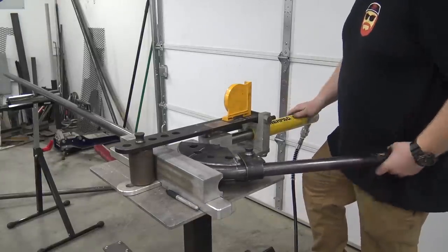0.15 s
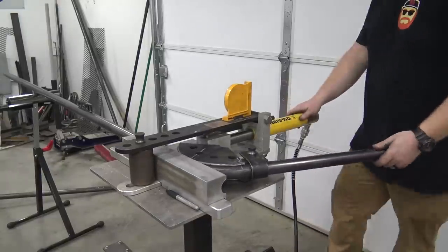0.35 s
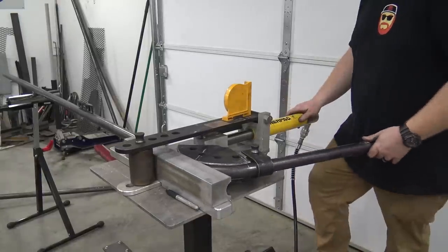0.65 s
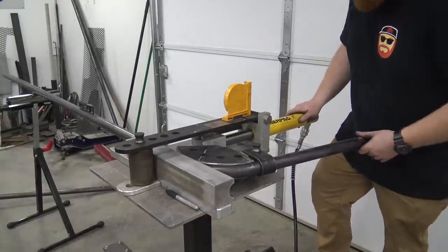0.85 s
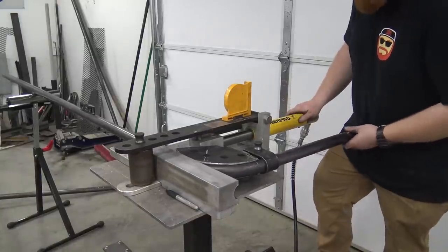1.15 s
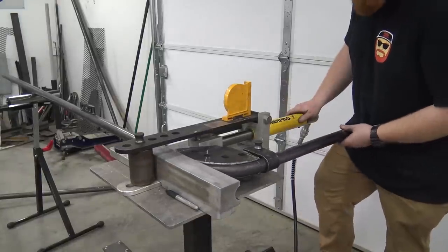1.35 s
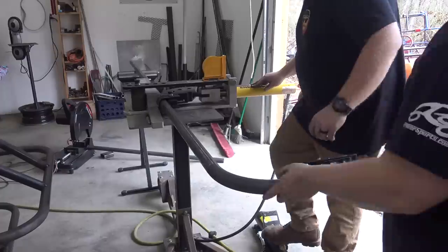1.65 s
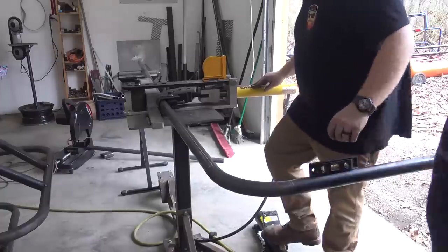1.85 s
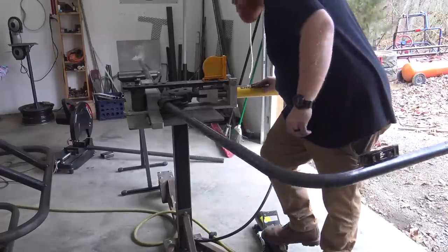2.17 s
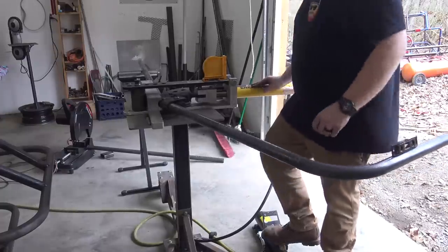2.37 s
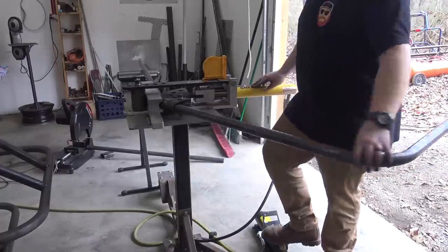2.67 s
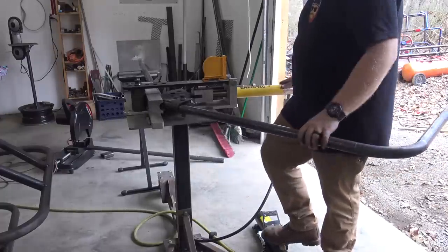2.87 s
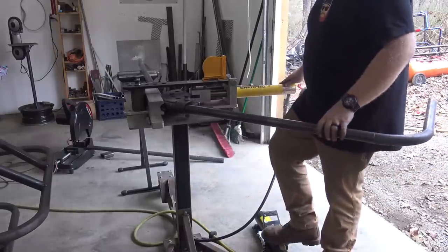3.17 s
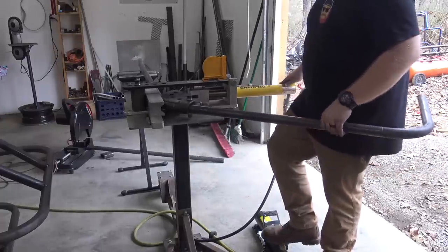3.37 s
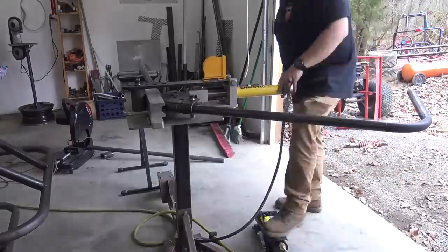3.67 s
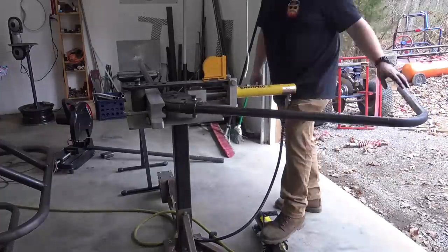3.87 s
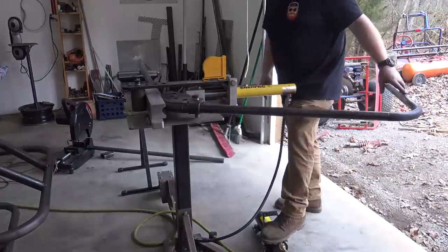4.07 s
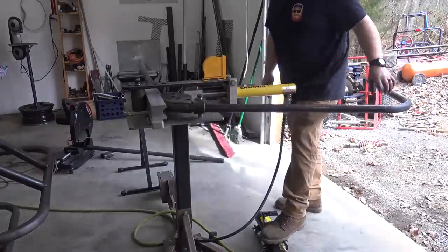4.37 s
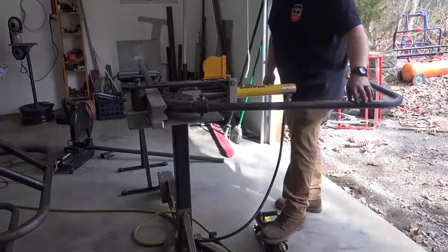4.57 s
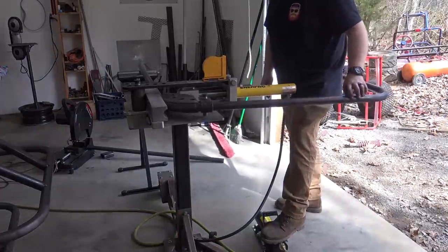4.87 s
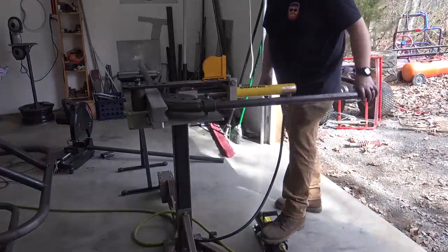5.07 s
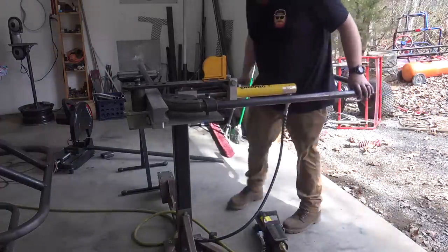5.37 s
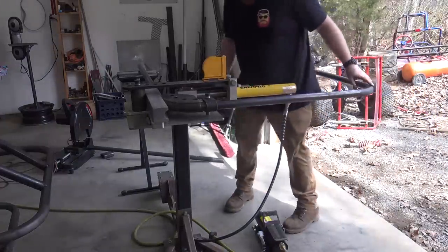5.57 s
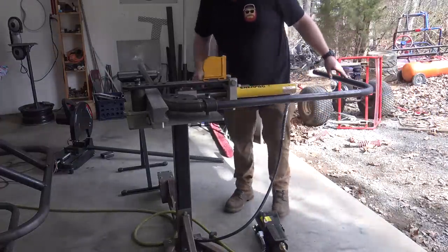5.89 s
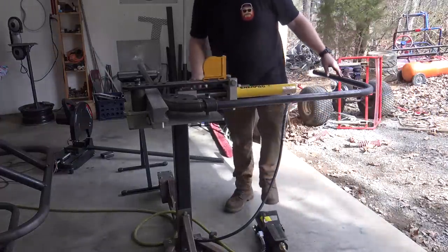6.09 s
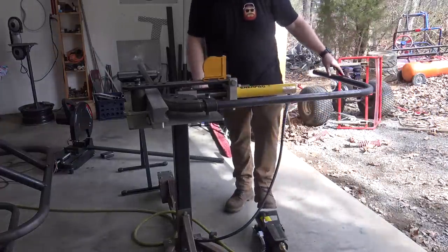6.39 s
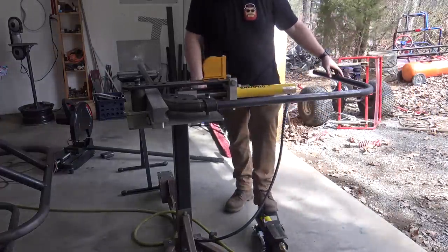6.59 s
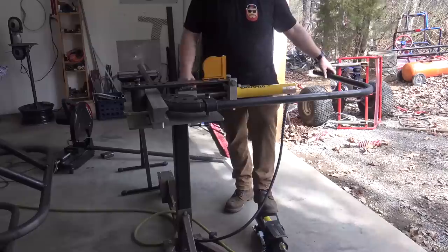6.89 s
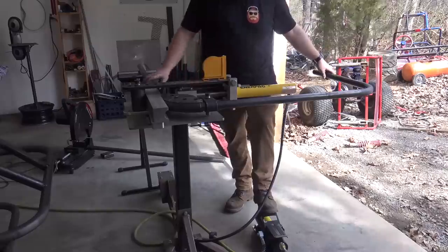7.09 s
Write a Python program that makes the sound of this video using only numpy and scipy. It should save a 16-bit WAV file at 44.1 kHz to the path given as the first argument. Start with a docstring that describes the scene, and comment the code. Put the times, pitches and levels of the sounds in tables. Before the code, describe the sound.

An air-driven foot pump chatters with rapid thumps and hissing spits in a garage, then cuts off, leaving a low machine hum.

```python
"""Foot pump in a garage

One microphone, near an air-driven hydraulic foot pump that works a tube bender. Each piston
stroke lets out a pressure pulse and a sharp spit of exhaust air, eight or nine a second, and
the walls answer. At an abrupt cut the pump's sound ends and the low hum of a motor and
compressor further off is left."""
import sys
import numpy as np
from scipy import signal
from scipy.fft import rfft, irfft, next_fast_len
from scipy.io import wavfile

SR = 44100
rng = np.random.default_rng(int(sys.argv[2]) if len(sys.argv) > 2 else 0)


def int16_out(signal):
    """Quantize to a 16-bit WAV file."""
    q = np.round(np.clip(np.atleast_2d(signal).T, -1, 1) * 32767)
    wavfile.write(sys.argv[1], SR, q.astype(np.int16))


N = 319284
TIME = np.arange(N) / SR
CUT_S = 5.412
SINCE_CUT_S = np.maximum(TIME - CUT_S, 0)
MOTOR_HZ, COMPRESSOR_HZ = 59.2, 26.25


def from_db(db):
    """Decibels to gain."""
    return 10 ** (np.asarray(db) / 20)


def at_hz(table, hz):
    """Each column of a spectrum table at the given frequencies."""
    known_hz, *columns = np.transpose(table)
    return [np.interp(np.log(hz + 1), np.log(known_hz), column) for column in columns]


def noise(spectrum):
    """Steady noise of a given colour, rms 1."""
    size = next_fast_len(N)
    level_db, = at_hz(spectrum, np.arange(size // 2 + 1) * SR / size)
    coloured = irfft(rfft(rng.standard_normal(size)) * from_db(level_db), size)[:N]
    return coloured / np.sqrt(np.mean(coloured ** 2) + 1e-20)


def drift(rate_hz):
    """A slow random wander, of the order of 1."""
    knots = rng.standard_normal(400)
    return np.interp(TIME * rate_hz, np.arange(len(knots)), knots)


def tone(turns, multiple, waver_db):
    """One partial of a rotating machine, its level wavering about rms 1."""
    phase = 2 * np.pi * (multiple * turns + rng.random())
    return np.sqrt(2) * np.sin(phase) * from_db(waver_db * drift(5))


def ring(clicks, hz, t60):
    """Each click sets a decaying sine ringing."""
    decay, angle = from_db(-60 / (t60 * SR)), 2 * np.pi * hz / SR
    return signal.lfilter([0, np.sin(angle)], [1, -2 * decay * np.cos(angle), decay ** 2], clicks + 1e-18)


def click_train(times, level_db):
    """One click at each time."""
    clicks = np.zeros(N)
    clicks[np.clip(np.round(times * SR).astype(int), 0, N - 1)] = from_db(level_db)
    return clicks


# The background rush, body and hiss. Each row: frequency in Hz, relative density in dB.
RUSH_BODY = [(12, -9), (22, 7), (40, -15), (85, -8), (170, -7.5), (400, -4.5), (650, -8), (1150, -6.5),
             (1700, -14), (3000, -19), (6000, -43)]
RUSH_HISS = [(800, -25), (2000, -15), (2900, -9), (3600, 2), (4300, -2.5), (5250, 0.5), (6800, -9),
             (10000, -13), (13000, -19), (16000, -31)]

def rush(pumping, pumping_db, throb):
    body = from_db(-37.5 + 2 * SINCE_CUT_S) * noise(RUSH_BODY)
    hiss = from_db(-47 + 1.2 * SINCE_CUT_S) * noise(RUSH_HISS)
    beat = 1 + throb * np.sin(2 * np.pi * COMPRESSOR_HZ * TIME)
    return (body + hiss) * beat * from_db(pumping_db * pumping)


# Swells of a background drone. Each row: start in seconds, length in seconds, harmonic, level in dB.
DRONE_SWELLS = [(5.36, 0.64, 2, -38), (5.75, 1.5, 1, -40.5), (6.3, 0.7, 2, -39)]

def drone(hz, sharp_hz, settle_s):
    """A low tone and its octave swell and fade, starting a little sharp and then settling."""
    turns = np.cumsum(hz + sharp_hz * np.exp(-SINCE_CUT_S / settle_s)) / SR
    swells = np.zeros(N)
    for start, length, multiple, db in DRONE_SWELLS:
        inside_s = np.minimum(TIME - start, start + length - TIME)
        fade = np.clip(inside_s / (0.18 * length), 0, 1)
        swells += from_db(db) * fade * tone(turns, round(multiple), waver_db=0.5)
    return swells


# The motor's hum. Each row: multiple of shaft speed, level in dB before the cut, level in dB after it.
MOTOR_PARTIALS = [(1, -36, -42.5), (2, -41, -44.5), (4, -46.5, -54), (5, -51.5, -46)]

def motor(pumping, run_s):
    """A motor hums further off, at multiples of its shaft speed."""
    return sum(from_db(after + pumping * (during - after)) * tone(MOTOR_HZ * run_s, multiple, waver_db=0)
               for multiple, during, after in MOTOR_PARTIALS)


# The compressor's hum. Each row: multiple of its beat, relative level in dB.
COMPRESSOR_PARTIALS = [(2, -45), (3, -54), (5, -55), (6, -50.5), (7, -57), (8, -47.5), (10, -63),
                       (13, -46.5), (16, -48.5), (19, -53.5), (20, -49.5), (22, -55), (23, -49.5),
                       (27, -52.5), (32, -51)]

def compressor(pumping, run_s, level_db, pumping_db):
    """The distant compressor hums in harmonics of its beat, fainter before the cut."""
    hum = sum(from_db(db) * tone(COMPRESSOR_HZ * run_s, multiple, waver_db=1.5)
              for multiple, db in COMPRESSOR_PARTIALS)
    return from_db(level_db + pumping_db * pumping) * hum


# Stirred air around the microphone. Each row: frequency in Hz, relative density in dB.
RUMBLE_SPECTRUM = [(5, -22), (12, 4), (18, -4), (25, -14), (42, -8), (65, -23), (250, -48), (2000, -80)]

def rumble(pumping, level_db):
    """Spent air stirs the room very slowly while the pump runs."""
    return pumping * from_db(level_db) * noise(RUMBLE_SPECTRUM)


# The garage's diffuse sound. Each row: frequency in Hz, relative level in dB, t60 in seconds.
GARAGE_BANDS = [(25, 9, .45), (80, 1.5, 0.44), (170, -2.5, 0.27), (262, -5, 0.13), (390, -6.5, 0.11),
                (533, -3, 0.26), (663, 6.5, 0.22), (844, -2, 0.17), (1290, 4.5, 0.19), (2100, 6, 0.21),
                (3950, 5.5, 0.17), (5020, -1.5, 0.1), (7000, -1, 0.19), (10500, -7, 0.18),
                (15500, -9.5, 0.08)]

def garage(sound, build_s, late_db, late_t60, wet_db):
    """Sound scattered round the garage builds up, then dies band by band over a faint late tail."""
    size = SR // 2
    age, hz = np.arange(size) / SR, np.arange(size // 2 + 1) * SR / size
    white, response = rfft(rng.standard_normal(size)), np.zeros(size)
    build, fading_s = np.minimum(age / build_s, 1), np.maximum(age - build_s, 0)
    edges_hz = np.geomspace(50, 17000, 32)
    for low, high in zip(edges_hz, edges_hz[1:]):
        level_db, t60 = at_hz(GARAGE_BANDS, np.sqrt(low * high))
        fade = from_db(-60 * fading_s / t60) + from_db(late_db - 60 * fading_s / late_t60)
        band = irfft(white * ((hz >= low) & (hz < high)), size) * build * fade
        unity_gain = np.sqrt(2 * (high - low) / SR / np.sum(band ** 2))
        response += from_db(level_db + wet_db) * unity_gain * band
    return signal.fftconvolve(sound, response)[:N]


# First echoes from floor, door and walls. Each row: delay in seconds, signed relative gain.
FIRST_ECHOES = [(.0132, 0.046), (.0217, -0.0022), (0.025, -0.058), (.0300, 0.042), (0.04, 0.18),
                (0.041, -0.2), (.0440, 0.12), (0.0469, -0.07), (.0490, 0.1)]

def echoes(sound, cut_hz, level_db):
    """The large surfaces send distinct, dulled returns to the microphone."""
    dull = from_db(level_db) * signal.sosfilt(signal.butter(2, cut_hz, fs=SR, output="sos"), sound)
    return sum(gain * np.interp(TIME - delay, TIME, dull, left=0) for delay, gain in FIRST_ECHOES)


# The jet through the muffler, close by. Each row: frequency in Hz, relative density in dB.
JET_SPECTRUM = [(500, -15.5), (1200, -8.5), (1900, -14.5), (3000, -9.5), (3650, -6), (4300, -8.5),
                (5050, 1.5), (5650, -0.5), (6300, -6.5), (7400, -9.5), (9000, -5), (11500, -1),
                (15500, -3.5)]

def exhaust(times, levels_db, open_s, empty_s, bleed_s, bleed_db, jet_db):
    """The port opens, the cylinder empties in a few milliseconds and the last air bleeds out."""
    age = np.arange(SR // 10) / SR
    opening = 1 - np.exp(-(age / open_s) ** 2)
    pressure = np.exp(-age / empty_s) + from_db(bleed_db) * np.exp(-age / bleed_s)
    puffs = signal.fftconvolve(click_train(times, levels_db), opening * pressure)[:N]
    return from_db(jet_db) * puffs * noise(JET_SPECTRUM)


def leak(level_db, trace_db, trace_t60):
    """Air seeps past the valve while the pedal is down; a faint trace of hiss fades after the cut."""
    fade_db = trace_db * (SINCE_CUT_S > 0) - 60 * SINCE_CUT_S / trace_t60
    return from_db(level_db + fade_db) * noise(JET_SPECTRUM)


# The pump housing's modes. Each row: frequency in Hz, relative level in dB, t60 in seconds.
HOUSING_MODES = [(159, -23, 0.023), (235, -29, 0.0071), (1190, -41, .008), (5150, -16, 0.0087)]

def valve(times, levels_db, width_s, bounce_s, bounce_db, pulse_db, knock_db, refill_hz):
    """The valve flips: one smooth pressure pulse, a slow rebound and a knock of the housing."""
    clicks = click_train(times, levels_db)
    # The pump stands on concrete: a copy reaches the microphone just behind and hollows the thump.
    bounce = click_train(times + bounce_s, levels_db + bounce_db)
    age = np.arange(-200, 201) / SR
    pulse = -signal.fftconvolve(clicks + bounce, np.exp(-0.5 * (age / width_s) ** 2), "same")
    rebounding = signal.sosfilt(signal.butter(1, refill_hz, "high", fs=SR, output="sos"), pulse)
    knock = sum(from_db(db) * ring(clicks, hz, t60) for hz, db, t60 in HOUSING_MODES)
    return from_db(pulse_db) * rebounding + from_db(knock_db) * knock


# The piston's quickening pace. Each row: time in seconds, strokes per second.
STROKE_RATE = [(0, 7.9445), (0.7, 8.0629), (1.35, 8.256), (2, 8.3907), (2.5, 8.479), (3, 8.7173),
               (3.8, 8.8335), (4.5, 8.8436), (5.3, 8.9204)]

def strokes(first_s, scatter_db):
    """Time, pulse dB and puff dB of each stroke; quicker ones have less time to fill and are weaker."""
    known_s, rates_hz = np.transpose(STROKE_RATE)
    times = [first_s]
    while times[-1] < CUT_S:
        times.append(times[-1] + 1 / np.interp(times[-1], known_s, rates_hz))
    times = np.array(times[:-1])
    quicker_hz = np.interp(times, known_s, rates_hz) - rates_hz[0]
    uneven_db = scatter_db * rng.standard_normal((len(times), 2))
    pulses_db = -6 - 1.63 * quicker_hz + uneven_db[:, 0]
    puffs_db = -9 - 1.0 * quicker_hz + uneven_db[:, 1]
    return times, pulses_db, puffs_db


def foot_pump(directions):
    """The nearby pump thumps and spits; its jet sends unrelated noise each way round the room."""
    times, pulses_db, puffs_db = strokes(first_s=0.0221, scatter_db=0.4)
    thump = valve(times, pulses_db, width_s=0.0002, bounce_s=0.00088, bounce_db=-5,
                  pulse_db=3.5, knock_db=2, refill_hz=115)
    jets = [exhaust(times + 0.00005, puffs_db, open_s=0.00094, empty_s=0.0029,
                    bleed_s=0.022, bleed_db=-15.5, jet_db=10) for _ in range(directions)]
    direct = thump + jets[0]  # only one direction points at the microphone
    jet_room = sum(garage(jet, build_s=0.02, late_db=-21, late_t60=0.86, wet_db=-1) for jet in jets)
    thump_room = garage(thump, build_s=0.032, late_db=-31, late_t60=0.46, wet_db=-5)
    thump_echoes = echoes(thump, cut_hz=1350, level_db=1.5)
    return direct + jet_room / np.sqrt(directions) + thump_room + thump_echoes


def scene():
    """The pump in front, the machines behind; the chatter and its room sound end at the cut."""
    pumping = np.clip((CUT_S - TIME) / 0.0036 + 0.5, 0, 1)  # 1 before the cut, 0 after
    run_s = TIME + np.cumsum(0.0015 * drift(4)) / SR  # motor and compressor drift in speed together
    machines = motor(pumping, run_s) + compressor(pumping, run_s, level_db=-0.5, pumping_db=-13.5)
    machines += (1 - pumping) * drone(hz=101, sharp_hz=2.2, settle_s=0.395)
    machines += rush(pumping, pumping_db=-5.5, throb=0.044)
    air = leak(level_db=-44.5, trace_db=-13, trace_t60=3) + rumble(pumping, level_db=-36.5)
    return (machines + air + pumping * foot_pump(directions=3))[None]


def record(dry):
    """One microphone channel, with the highest peaks rounded and the top cut."""
    ceiling, cutoff_hz = 2.9, 15900
    rounded = ceiling * np.tanh(dry / ceiling)
    return signal.sosfilt(signal.ellip(10, 0.2, 70, cutoff_hz, fs=SR, output="sos"), rounded)


dry = scene()
out = record(dry)
int16_out(out)
```